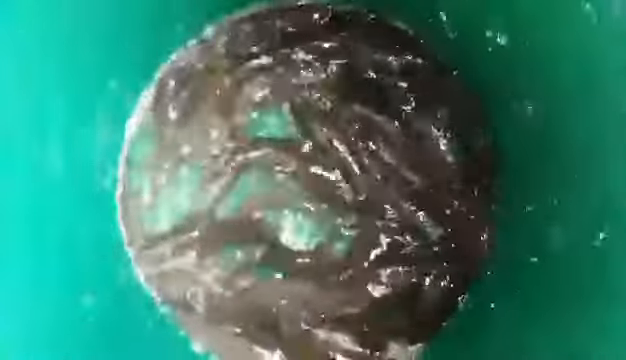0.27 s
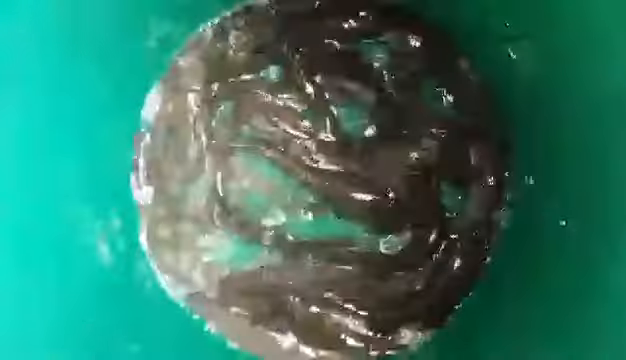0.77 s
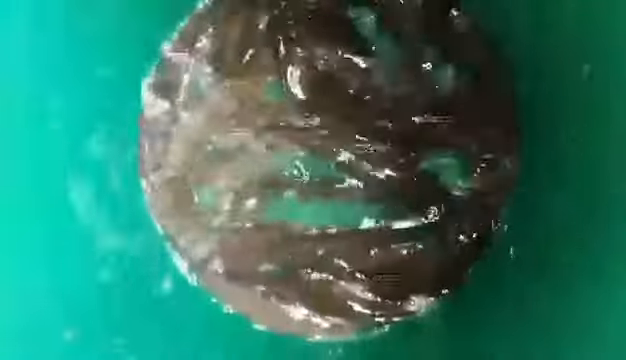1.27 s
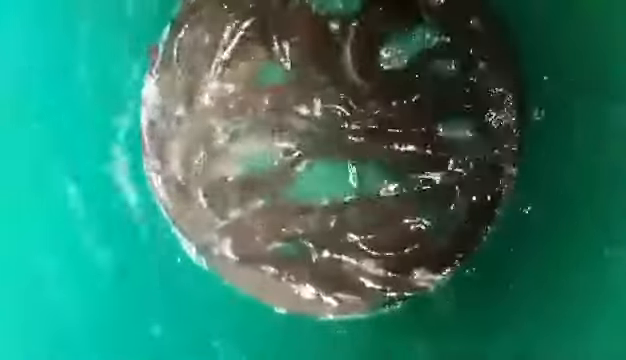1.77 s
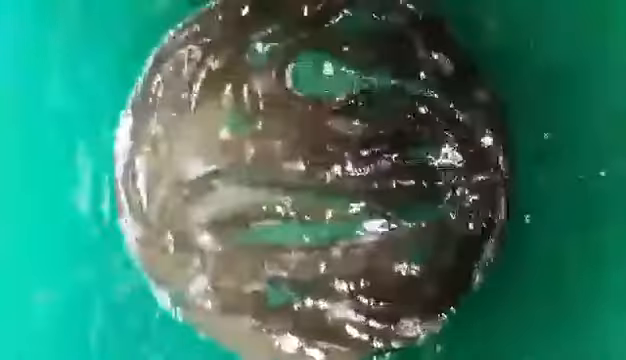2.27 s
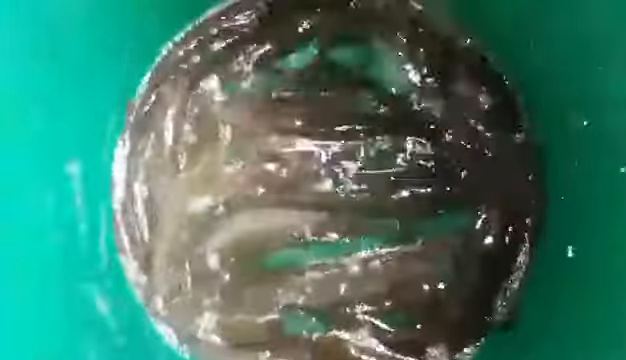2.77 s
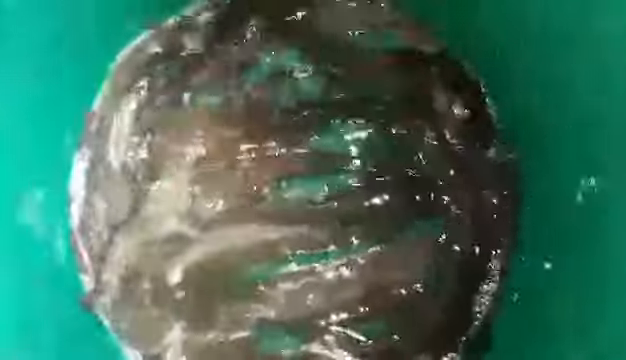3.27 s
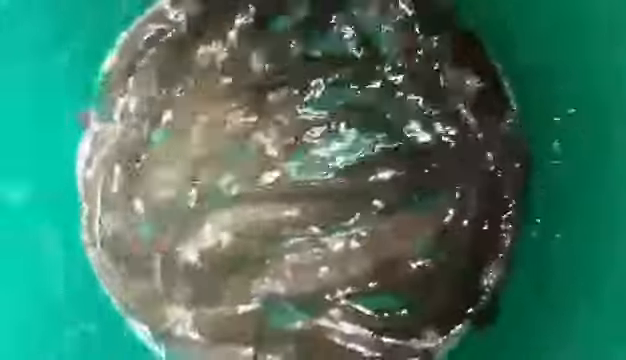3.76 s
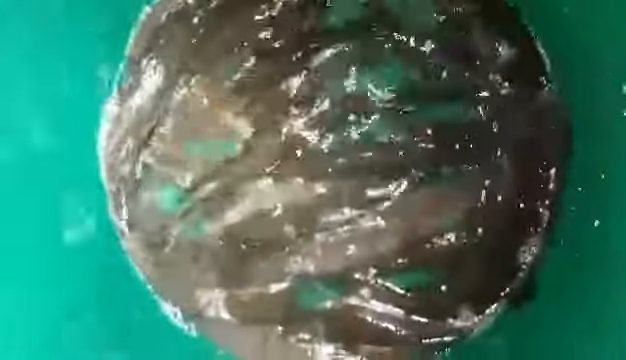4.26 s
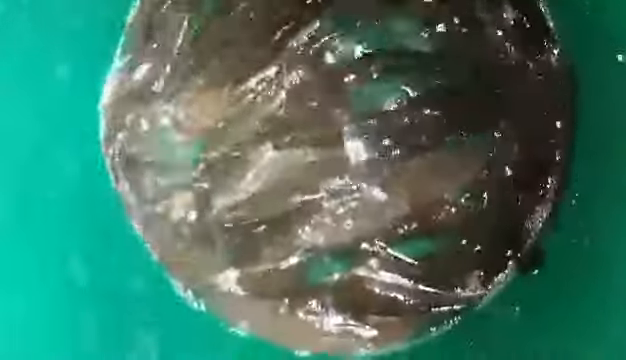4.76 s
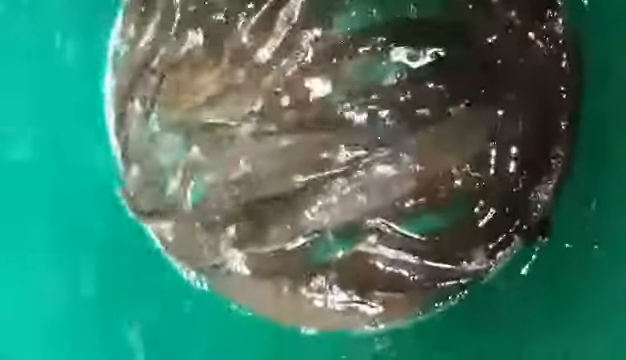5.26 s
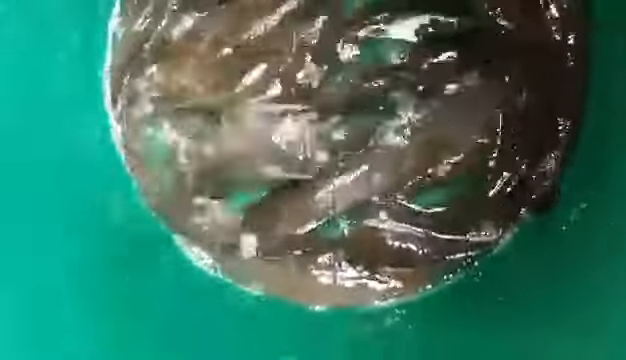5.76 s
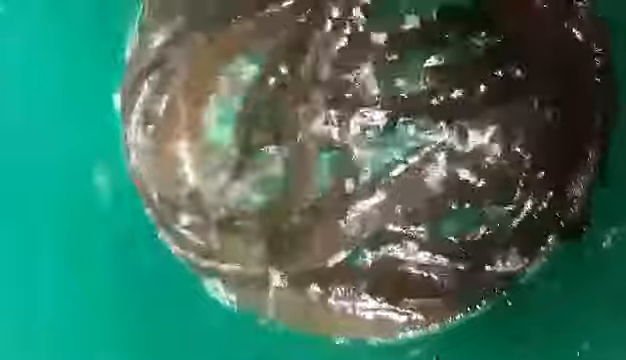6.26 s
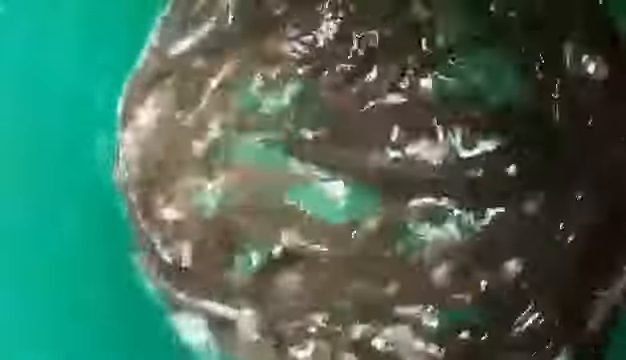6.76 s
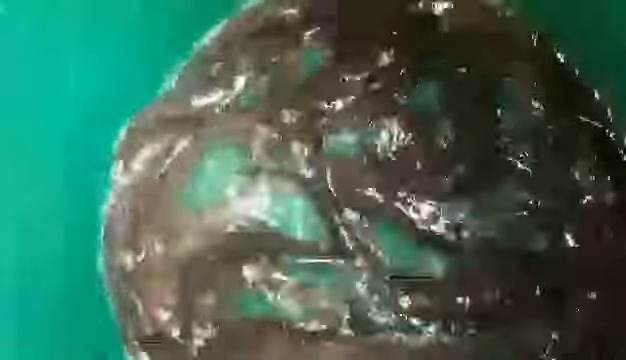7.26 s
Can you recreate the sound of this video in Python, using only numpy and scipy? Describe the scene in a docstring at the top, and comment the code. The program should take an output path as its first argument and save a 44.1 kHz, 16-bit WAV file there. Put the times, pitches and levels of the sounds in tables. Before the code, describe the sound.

Close, wet and lively: tail slaps scatter high, glassy droplets and short hissing spray, while larger bubbles gulp underneath. After two seconds soft bodies drum on the tub's resonant floor, with another quick run of thumps around four seconds. Splashing returns, growing denser and more continuous in the last two seconds. Plastic walls add brief reflections; the outdoor background is very quiet.

```python
"""A slap and its spray are heard first: small fish thrash in a finger of water in a deep plastic tub outdoors.
Slaps free swarms of decaying bubble tones and filtered-noise spray; larger bubbles gulp, lone ones sing.
Bodies strike the drum-like bottom, heard as damped modes; rubbing and nudging keep the modes sounding.
Feedback delays echo the water sounds between the walls; breeze, a far hush and a faint insect lie beneath.
A small microphone adds the resonances of its port and cuts the top."""
import sys
import numpy as np
from scipy import signal
from scipy.fft import rfft, irfft, next_fast_len
from scipy.io import wavfile
from scipy.ndimage import uniform_filter1d

SR = 44100
rng = np.random.default_rng(int(sys.argv[2]) if len(sys.argv) > 2 else 0)


def put_to_file(sound):
    """Save the sound as 16-bit audio at rate SR, in the file named by the first command-line argument."""
    columns = np.atleast_2d(sound).T  # one column per channel
    safe = np.clip(columns, -1, 1)
    whole_steps = np.round(safe * 32767)
    wavfile.write(sys.argv[1], SR, whole_steps.astype(np.int16))


N = 332073

# Light wind on the microphone: start_s, level_db
BREEZE_CURVE = [(0.0, -67), (0.75, -58), (1.55, -41.5), (1.8, -60), (2.2, -52), (2.6, -67.5), (3.3, -58),
                (3.7, -71.5), (4.2, -53.5), (5.0, -69.5), (5.45, -64), (6.85, -56.5), (7.53, -57)]
# Spectrum of the far outdoor hush: pitch_hz, level_db (per Hz)
HUSH_SPECTRUM = [(18, -2), (30, -30), (133, 11.5), (206, -21.5), (674, -4), (1350, -14), (1530, -5.5),
                 (2920, -55.5), (5010, -37), (6640, -24), (14000, -30)]
HUSH_DB = -70.5
# Far insect whine, with the time its fade begins
INSECT_DB, INSECT_FADE_START_S, INSECT_FADE_DB_PER_S = -90, 2.9, 65.5

# The shoal churning against the tub: start_s, slosh_level_db, bottom_drumming_level_db
CHURN_CURVES = [(0.0, -72.5, -60.5), (1.17, -80, -80.5), (1.45, -57, -51), (1.89, -72.5, -72),
                (2.12, -46, -47), (2.6, -74, -67.5), (3.0, -50.5, -55.5), (3.31, -57, -45),
                (3.58, -69.5, -64), (3.9, -80.5, -56), (4.11, -56.5, -52), (4.47, -64, -46),
                (4.63, -62, -68), (5.01, -79, -70.5), (5.79, -50.5, -48.5), (6.27, -56.5, -48),
                (6.65, -44, -53), (7.53, -51, -45.5)]
# Upper modes of wall and bottom: pitch_hz, loaded_level_db, full_t60_s, free_bottom_gain_db
UPPER_MODES = [(272.8, -8, 0.23, 7), (309, -2.5, 0.085, -2.5), (358.7, -1, 0.13, -8), (443, -5, 0.15, -8.5),
               (555, -19, 0.62, -1.5), (677, -8, 0.18, 2.5), (892.5, -3, 0.15, -0.5), (985, -6.5, 0.22, 4)]
LOADED_RING, RUBBED_RING = 0.4, 0.6   # shares of the upper modes' full ring time
# Lowest bottom resonances under shifting load: pitch_hz, nominal_width_hz, level_db
BOTTOM_RESONANCES = [(107.4, 42, -0.5), (134, 190, 9.5), (143.8, 9.4, 6.5)]

# Fine spray between the slaps: start_s, level_db
SPRAY_CURVE = [(0.0, -61.5), (0.25, -60.5), (0.63, -66), (1.26, -65.5), (1.45, -59), (1.68, -62.5),
               (1.91, -70), (2.58, -70.5), (2.91, -64.5), (3.84, -68), (4.07, -56), (4.32, -70.5),
               (4.63, -60.5), (5.01, -75.5), (5.22, -75), (5.35, -58), (5.68, -65.5), (5.87, -54),
               (6.0, -44.5), (6.25, -54), (6.6, -48), (6.92, -45), (7.19, -48.5), (7.4, -38), (7.53, -45)]
# Spectrum of the spray: pitch_hz, level_db (per Hz)
SPRAY_SPECTRUM = [(600, -3.5), (1100, -1.5), (1300, -13), (1550, -2.5), (2390, -2), (2700, -4.5), (3410, 2),
                  (4300, -2), (4900, 8), (6100, -5.5), (6800, -14.5), (10700, -26.5), (13500, -27),
                  (14500, -62)]
FIZZ_DB, FIZZ_HZ = -30, 7000   # finest mist: level re the spray, lower band edge

# Tail slaps: start_s, nominal_level_db, bubble_pitch_hz, t60_s, wash_level_db (re nominal)
TAIL_SLAPS = [(0.0044, -17, 3940, 0.1, -27.5), (0.0706, -27.5, 5250, 0.083, -6.5),
              (0.108, -30, 5360, 0.058, -36), (0.194, -23.5, 2810, 0.16, -14.5),
              (0.3048, -34, 2180, 0.14, -17), (0.337, -33.5, 2280, 0.077, -9.5),
              (0.3664, -26.5, 4830, 0.083, -12), (0.4202, -34.5, 4230, 0.13, -2.5),
              (0.575, -20, 3280, 0.059, -18), (0.7322, -4.5, 3974, 0.054, -56),
              (0.839, -26, 3040, 0.13, -27), (0.965, -31.5, 3050, 0.11, -40),
              (1.166, -38, 6740, 0.026, -25), (1.192, -38.5, 2100, 0.091, -15),
              (1.2491, -28, 4160, 0.074, 0), (1.3295, -24.5, 4600, 0.056, -3.5),
              (1.348, -25.5, 4630, 0.07, -13), (1.3694, -26, 1740, 0.14, -13),
              (1.407, -24.5, 5480, 0.053, -9), (1.4326, -17, 4000, 0.041, -17),
              (1.4535, -10.5, 2630, 0.039, -3.5), (1.501, -18, 4680, 0.052, -31),
              (1.5244, -15, 3470, 0.058, -9), (1.5557, -19, 4550, 0.076, -18),
              (1.594, -24, 5500, 0.077, -11.5), (1.967, -39.5, 6670, 0.05, -21.5),
              (2.5679, -35, 5560, 0.032, -13), (2.708, -25.5, 4120, 0.14, -27.5),
              (2.794, -32, 4830, 0.14, -10.5), (3.0046, -29, 5750, 0.071, -22),
              (3.1709, -41.5, 1840, 0.062, 2.5), (3.2288, -16.5, 3030, 0.058, -25),
              (3.495, -36.5, 1835, 0.12, -15), (4.05, -35.5, 1920, 0.14, -6),
              (4.1536, -41, 1900, 0.099, -16), (4.247, -41, 3520, 0.12, -19), (4.369, -45, 2540, 0.098, -5),
              (4.589, -19, 4900, 0.059, -7), (4.755, -50, 4840, 0.13, 2.5), (4.947, -44, 4280, 0.17, -18),
              (5.219, -23.5, 3250, 0.21, -36), (5.9647, -19.5, 2046, 0.12, -15.5),
              (5.985, -26.5, 4560, 0.13, -5.5), (6.243, -22.5, 5340, 0.24, -47),
              (6.285, -27.5, 4050, 0.15, -13.5), (6.418, -33, 2020, 0.053, -3),
              (6.461, -27, 3130, 0.082, -6), (6.562, -31, 2740, 0.1, -13), (6.617, -28.5, 3700, 0.11, -30),
              (6.9461, -16, 2506, 0.089, -19.5), (6.982, -25, 2960, 0.064, -30),
              (7.0133, -29.5, 3680, 0.57, -9), (7.0776, -20, 3270, 0.23, -17),
              (7.4628, -17.5, 5400, 0.068, -10.5)]
SWARM_DB = -11.5   # bubble swarm re a slap's nominal level
CRACK_DB, CRACK_S = -3, 0.0019   # extra crack opening the wash: level re wash, decay time constant

TUB_T60_S, TUB_ECHO_DB = 0.19, -24
# Fine drops bursting with a bright tick: start_s, nominal_level_db
BURSTING_DROPS = [(0.0518, -26), (0.074, -26.5), (0.193, -33), (0.733, -16), (1.555, -34), (4.572, -28),
                  (5.2214, -27), (6.448, -21.5)]
# Gulps of larger bubbles: start_s, nominal_level_db, pitch_hz
BUBBLE_GULPS = [(0.072, -29.5, 747), (0.222, -42, 1630), (0.336, -42, 980), (0.427, -25, 643),
                (0.775, -44, 713), (0.873, -43.5, 780), (0.968, -34, 1730), (1.255, -20, 800),
                (1.296, -34.5, 674), (1.353, -30.5, 1590), (1.438, -21, 1080), (1.525, -22, 1590),
                (1.595, -35.5, 1440), (1.884, -34, 1000), (2.039, -31.5, 700), (2.091, -27, 960),
                (2.112, -25.5, 1420), (2.142, -38.5, 980), (2.212, -34, 1170), (2.289, -30, 1106),
                (2.469, -35.5, 1030), (2.485, -37, 1000), (2.823, -35, 588), (3.173, -29.5, 935),
                (3.175, -27.5, 608), (3.495, -30.5, 490), (3.93, -26, 1570), (5.214, -41, 985),
                (5.338, -29, 456), (6.661, -30, 444)]
GULP_T60_S, GULP_SPLASH_DB = 0.066, -5.5   # swarm decay; dull splash re nominal level

# Knocks: start_s, nominal_level_db, loaded_bottom_pitch_hz, upper_mode_level_db (re nominal)
BOTTOM_KNOCKS = [(0.427, -39.5, 139, -36), (1.254, -34.5, 153.5, -6), (1.542, -25.5, 115, -61),
                 (1.892, -32.5, 150.3, -8.5), (2.035, -15, 147, -11), (2.088, -22.5, 144.7, -5.5),
                 (2.212, -20.5, 141.9, -9.5), (2.435, -39, 139.6, -0.5), (2.661, -42, 134, -8.5),
                 (3.071, -33, 110, -30), (3.128, -29.5, 114, -46), (3.227, -25, 110, -28),
                 (3.278, -30.5, 110, -20), (3.914, -26.5, 130.2, -18), (3.952, -15.5, 134, -13.5),
                 (4.01, -17, 133, -15.5), (4.068, -21.5, 134, -37.5), (4.116, -19.5, 134, -18),
                 (4.175, -24, 134, -41), (4.215, -22, 134, -14), (4.303, -24, 131, -19),
                 (4.359, -37, 139, -18), (4.488, -29.5, 137, -4.5), (4.53, -27, 134, -15),
                 (4.587, -32, 123.5, -11), (5.335, -34, 149.2, -7.5), (5.429, -28, 114, -11.5),
                 (5.684, -31.5, 139.7, -13.5), (5.788, -34, 148.5, 3), (6.411, -28.5, 134, -34),
                 (6.796, -26, 136.6, 2), (6.861, -29.5, 144.3, -28), (7.376, -30, 139.7, -31)]
# The free bottom rings long; bodies lying on it detune and damp it
FREE_HZ, FREE_T60_S, LOADED_T60_S, LOAD_SPAN_HZ = 146.8, 0.39, 0.15, 5.9
STOP_S, PUSH_LAG_S = 0.012, 0.0043   # fade-out ending at the next knock; bottom's delay after contact
SOFT_DB_PER_OCTAVE = 1   # soft-body muting of higher modes: applied once when free, twice when loaded

# Lone clear bubbles: start_s, peak_level_db, pitch_hz, time_to_peak_s
SINGING_BUBBLES = [(1.412, -38, 2060, 0.0039), (1.512, -38.5, 3850, 0.0016), (3.497, -43, 890, 0.01),
                   (3.9115, -21.5, 4640, 0.0013), (3.917, -27, 4820, 0.0027), (3.927, -23, 4850, 0.0026),
                   (3.952, -29, 4840, 0.004), (4.05, -44.5, 1876, 0.008), (4.514, -31.5, 3446, 0.0083),
                   (4.515, -40.5, 1485, 0.014), (5.297, -19, 4820, 0.0044)]
# Bodies sweeping through water: start_s, level_db, froth_pitch_hz, held_s, wash_level_db (re froth)
BODY_SWEEPS = [(2.036, -50.5, 1450, 0.0092, -4), (2.1045, -53.5, 1490, 0.051, -9),
               (2.216, -55, 2030, 0.021, -18), (2.7594, -52.5, 1790, 0.0083, -5),
               (2.8, -51, 1990, 0.014, -11), (2.857, -51, 1970, 0.008, -9), (2.901, -66, 3270, 0.011, 3.5),
               (3.91, -38, 4910, 0.035, -1), (4.49, -59.5, 1590, 0.006, 7.5), (4.519, -41, 3400, 0.019, -9),
               (4.5633, -48.5, 3700, 0.01, 5.5), (5.1825, -58.5, 3150, 0.024, -4.5),
               (5.298, -42, 3690, 0.019, -1), (5.3258, -38, 3470, 0.0081, -0.5),
               (5.818, -63.5, 4380, 0.041, 12), (5.897, -48, 3530, 0.0055, 9.5),
               (6.093, -42.5, 5180, 0.054, -10), (6.516, -45, 3480, 0.0031, 3.5),
               (6.6675, -42, 2300, 0.0047, 1.5), (6.76, -37, 4760, 0.029, 4),
               (6.8756, -41.5, 5310, 0.0039, 0.5), (7.212, -54.5, 5300, 0.17, 4.5),
               (7.39, -55, 4200, 0.08, 10.5)]
FROTH_T60_S = 0.02

# Ringing of the microphone port: pitch_hz, width_hz, peak_gain_db
PORT_RESONANCES = [(4800, 15, 5), (3700, 330, 1.5)]
CUTOFF_HZ = 14700


def amp(db):
    """Amplitude ratio: twenty decibels make a factor of ten."""
    return 10 ** (np.asarray(db) / 20)


def rms_one(x):
    """Normalization: scale a signal to unit root-mean-square."""
    return x / np.sqrt(np.mean(x ** 2) + 1e-20)


def in_time(rows):
    """Linear interpolation: turn each curve column into a value per sample."""
    s, *columns = np.transpose(rows)
    return [np.interp(np.arange(N) / SR, s, column) for column in columns]


def drift(rate_hz):
    """Low-pass filtered chance: a slow random curve of about unit spread."""
    step = 40   # samples between computed points
    r = np.exp(-2 * step * np.pi * rate_hz / SR)
    white = rng.standard_normal(N // step + 2002)
    slow = signal.lfilter([1], [1, -2 * r, r * r], white)[2000:]   # drop the filter's start
    return np.interp(np.arange(N) / step, np.arange(len(slow)), rms_one(slow))


def coloured(x, spectrum):
    """Minimum-phase filtering: a spectrum of (Hz, dB) points is imposed without sounding early."""
    size = next_fast_len(x.shape[-1] + 4096)
    hz, db = np.transpose(spectrum)
    bins_hz = np.fft.rfftfreq(size, 1 / SR)
    gain = amp(np.interp(np.log(bins_hz + 1), np.log(hz), db))
    cepstrum = irfft(np.log(gain), size)
    cepstrum[1:size // 2] *= 2   # fold the acausal half onto the causal half
    cepstrum[size // 2 + 1:] = 0
    return irfft(rfft(x, size) * np.exp(rfft(cepstrum)), size)[..., :x.shape[-1]]


def ring(x, hz, t60):
    """Damped resonance: a unit click starts a decaying sine of initial height near one."""
    r = amp(-60 / (t60 * SR))
    w = 2 * np.pi * hz / SR
    return signal.lfilter([0, np.sin(w)], [1, -2 * r * np.cos(w), r * r], x + 1e-18)


def band(x, low_hz, high_hz):
    """Band-pass filtering: keep the energy between two frequencies."""
    return signal.sosfilt(signal.butter(2, [low_hz, high_hz], "band", fs=SR, output="sos"), x)


def add(out, s, x):
    """Superposition: mix x into out from time s."""
    i = round(s * SR)
    out[i:i + len(x)] += x[:N - i]


def grains(per_s, spread_db):
    """Random impulses: chance arrivals of either sign and very uneven size."""
    sizes_db = spread_db * np.minimum(rng.exponential(1, N), 5)
    sizes = amp(sizes_db) * rng.choice([-1, 1], N)
    return sizes * (rng.random(N) < per_s / SR)


def droplets(clicks, low_hz, high_hz, cycles):
    """Bubble resonance by size: each click rings one of 24 pitches, losing 60 dB in the given cycles."""
    dealt = rng.integers(0, 24, N)
    pitches = np.geomspace(low_hz, high_hz, 24)
    return sum(ring(clicks * (dealt == k), hz, cycles / hz) * np.sqrt(hz) for k, hz in enumerate(pitches))


def tub_modes(x, ring_share):
    """Modal superposition of wall and bottom: x is one push for all modes, or one for each."""
    pushes = np.broadcast_to(x, (len(UPPER_MODES), N))
    return sum(amp(db) * ring(pushes[k], hz, t60 * ring_share) * (-1) ** k
               for k, (hz, db, t60, _) in enumerate(UPPER_MODES))


def swarm(s, db, hz, t60, octaves, cycles, chance):
    """Bubble-cloud radiation: thick at first, then thinning; most share a size, a few stray far."""
    when, tone, size = chance * (np.arange(chance.shape[1]) > 0)   # the first bubble is the loudest
    born = t60 * .5 * when ** 2
    stray = octaves * np.sin(2 * np.pi * tone) ** 5
    pitch = hz * 2 ** np.maximum(stray, 0.37 * stray)[:, None]   # small strays go farther than large ones
    height = amp(db - 60 * born / t60 - 7.7 * np.sqrt(size))[:, None]
    t = np.arange(SR // 30) / SR
    swell = 1 - np.exp(-t * pitch / 1.5)
    tone_wave = np.sin(2 * np.pi * pitch * t * (1 + 0.27 * t))   # rising as they near the air
    bubbles = swell * tone_wave * amp(-60 * t * pitch / cycles)
    at = np.round((s + born[:, None]) * SR).astype(int) + np.arange(len(t))
    return np.bincount(np.minimum(at, N).ravel(), (height * bubbles).ravel(), N + 1)[:N]


def washes(count, size):
    """Filtered random spatter: uneven droplets, every splash with colour patches of its own."""
    unevenness = amp(2.6 * rng.standard_normal((count, size // 32 + 1))).repeat(32, axis=1)[:, :size]
    spatter = rng.standard_normal((count, size)) * unevenness
    patches = amp(3.0 * rng.standard_normal((count, 40)))
    patches = patches.repeat(size // 80 + 1, axis=1)[:, :size // 2 + 1]
    smooth_patches = uniform_filter1d(patches, size=size // 160, axis=1)
    patchy = irfft(rfft(spatter) * smooth_patches, size)
    dull = signal.butter(2, 8000.0, fs=SR, output="sos")
    wash = signal.sosfilt(dull, coloured(patchy, SPRAY_SPECTRUM))
    return spatter, wash / wash.std(axis=1, keepdims=True)


def outdoors(breeze_db):
    """Broadband and resonant noise: lumpy breeze on the microphone, far hush and a faint insect."""
    gusts = amp(3.5 * drift(12.0))
    breeze = rms_one(band(rng.standard_normal(N), low_hz=32.0, high_hz=80) * gusts)
    hush = coloured(rng.standard_normal(N), HUSH_SPECTRUM) * amp(4.3 * drift(1.2))
    hush = hush / np.std(band(hush, 140, 14000))   # level reference excludes the lowest rumble
    insect = rms_one(ring(rng.standard_normal(N), hz=9000, t60=.008))
    fading_s = np.maximum(np.arange(N) / SR - INSECT_FADE_START_S, 0)
    insect_gain = amp(INSECT_DB - INSECT_FADE_DB_PER_S * fading_s)
    return amp(breeze_db) * breeze + amp(HUSH_DB) * hush + insect_gain * insect


def slosh(slosh_db):
    """Frictional excitation: soft bodies rub the wall's modes while larger bubbles gurgle."""
    soft = signal.butter(1, 700.0, fs=SR, output="sos")
    rubbing = grains(400.0, spread_db=6.0) * amp(3.5 * drift(15.0))
    rub = tub_modes(signal.sosfilt(soft, rubbing), RUBBED_RING)
    gurgle = droplets(grains(200.0, spread_db=4.0), low_hz=276, high_hz=498, cycles=26.7)
    return amp(slosh_db) * rms_one(rms_one(rub) + 0.76 * rms_one(gurgle))


def drumming(bottom_db):
    """Random excitation of resonance: countless soft nudges keep the bottom humming."""
    nudges = grains(140.0, spread_db=-5.5)
    hum = sum(amp(db) * rms_one(ring(ring(nudges, hz, 6.3 / width), hz, 0.17))
              for hz, width, db in BOTTOM_RESONANCES)
    return amp(bottom_db) * rms_one(hum)


def spray(spray_db):
    """Droplet impacts and noise: clumps on a thin hiss, low and high bands fluctuating separately."""
    clumps = amp(2.2 * drift(25.0))
    drops = droplets(grains(1600.0 * clumps, spread_db=2.0), low_hz=1107.0, high_hz=6775, cycles=140.0)
    drops_and_hiss = rms_one(drops) + .75 * rng.standard_normal(N)
    mix = clumps * rms_one(coloured(drops_and_hiss, SPRAY_SPECTRUM))
    low = signal.sosfilt(signal.butter(2, 2800.0, fs=SR, output="sos"), mix)
    high_swell = amp(2.2 * drift(6.0))
    fizz = amp(FIZZ_DB) * clumps * rms_one(band(rng.standard_normal(N), FIZZ_HZ, 14200))
    low_part = low * amp(0.57 * drift(10.0))
    high_part = (mix - low + fizz) * high_swell
    return amp(spray_db) * rms_one(low_part + high_part)


def slaps():
    """Impact on a free surface: each slap frees a swarm of small bubbles and a ragged wash."""
    bubbles, out, t = 0, np.zeros(N), np.arange(SR // 4) / SR
    chances = rng.random((len(TAIL_SLAPS), 3, 40))
    slap_washes = washes(len(TAIL_SLAPS), len(t))[1]
    crack = 1 + amp(CRACK_DB) * np.exp(-t / CRACK_S)
    onset = t / (t + 0.0048)
    for (s, db, hz, t60, wash_db), chance, wash in zip(TAIL_SLAPS, chances, slap_washes):
        bubbles = bubbles + swarm(s, db + SWARM_DB, hz, t60, 0.587, 62.0, chance)
        near = rms_one(band(wash, hz / 2.11, hz * 1.49))   # droplet sizes gather round the bubbles'
        envelope = onset * amp(db - 60 * t / t60)
        add(out, s, envelope * amp(wash_db) * crack * (wash + 0.27 * near))
    dull = signal.butter(4, 6500.0, fs=SR, output="sos")   # the smallest bubbles radiate little
    return signal.sosfilt(dull, bubbles) + out * amp(2.0 * drift(76.0))


def tub_echo(x):
    """Repeated wall reflection: six short feedback delays return the sound with decay."""
    size = next_fast_len(N + SR)
    w = 2 * np.pi * np.fft.rfftfreq(size)
    lags = np.array([.0026, .0041, .0059, .0083, .0112, .0157]) * SR   # seconds to samples
    loops = [amp(-60 * lag / SR / TUB_T60_S) * np.exp(-1j * w * lag) for lag in lags]
    return irfft(rfft(x, size) * sum(g / (1 - g) for g in loops), size)[:N]


def ticks():
    """Transient radiation: bursting drops give bright noise a few milliseconds long."""
    out, t = np.zeros(N), np.arange(SR // 20) / SR
    envelope = t / (t + 0.012) * amp(-60 * t / 0.012)
    for (s, db), white in zip(BURSTING_DROPS, rng.standard_normal((len(BURSTING_DROPS), len(t)))):
        add(out, s, amp(db) * envelope * rms_one(band(white, low_hz=5200, high_hz=14700)))
    return out


def gulps():
    """Entrained-air resonance: air folded under a body forms large bubbles in a dull splash."""
    out, t = np.zeros(N), np.arange(SR // 4) / SR
    chances = rng.random((len(BUBBLE_GULPS), 3, 20))
    whites = rng.standard_normal((len(BUBBLE_GULPS), len(t)))
    for (s, db, hz), chance, white in zip(BUBBLE_GULPS, chances, whites):
        out += swarm(s, db, hz, GULP_T60_S, 0.79, 14.3, chance)
        envelope = t / (t + 0.012) * amp(db + GULP_SPLASH_DB - 45 * t / GULP_T60_S)
        add(out, s, envelope * rms_one(band(white, hz / 1.3, hz * 1.47)))
    return out


def knocks():
    """Modal impact under load: a soft body strikes; the next one stops the loaded bottom's ring."""
    out, strikes, t = np.zeros(N), np.zeros((2, len(UPPER_MODES), N)), np.arange(SR) / SR
    # Each knock lands on a spot of its own, with its own mode levels in dB
    spots = 2.0 * rng.standard_normal((len(BOTTOM_KNOCKS), len(UPPER_MODES)))
    mode_hz, _, _, free_gain_db = np.transpose(UPPER_MODES)
    muted_db = SOFT_DB_PER_OCTAVE * np.log2(mode_hz / mode_hz[0])
    gaps = np.append(np.diff(np.transpose(BOTTOM_KNOCKS)[0]), 1)
    swell = 1 - np.exp(-t / 0.014)
    for (s, db, hz, upper_db), spot_db, gap in zip(BOTTOM_KNOCKS, spots, gaps):
        free = np.exp(-((hz - FREE_HZ) / LOAD_SPAN_HZ) ** 2)   # 1 is free, 0 fully loaded
        t60 = LOADED_T60_S + (FREE_T60_S - LOADED_T60_S) * free
        stopped = free + (1 - free) * np.clip((gap - t) / STOP_S, 0, 1)
        envelope = amp(db) * swell * stopped * amp(-60 * t / t60)
        add(out, s + PUSH_LAG_S, envelope * np.sin(2 * np.pi * hz * t))
        strike_db = db + upper_db + spot_db + free * free_gain_db - (2 - free) * muted_db
        strikes[round(free), :, round(s * SR)] = amp(strike_db)
    soft = signal.sosfilt(signal.butter(2, 600.0, fs=SR, output="sos"), strikes)
    return out + tub_modes(soft[0], LOADED_RING) + tub_modes(soft[1], 1)


def pings():
    """Single-bubble oscillation: a lone bubble swells, sings on one pitch and fades."""
    out, t = np.zeros(N), np.arange(SR // 5) / SR
    for s, db, hz, swell in SINGING_BUBBLES:
        envelope = (t / swell * np.exp(1 - t / swell)) ** 2
        add(out, s, amp(db) * envelope * np.sin(2 * np.pi * hz * t))
    return out


def froth(hz, spatter, t60):
    """Continuously driven resonance: bubbles of one size ring as narrow noise, already under way."""
    return rms_one(ring(np.tile(spatter, 2), hz, t60)[len(spatter):])


def sweeps():
    """Flow excitation and decay: a sweep holds its froth and wash, then the water settles."""
    out, t = np.zeros(N), np.arange(SR // 2) / SR
    for (s, db, hz, held, wash_db), spatter, wash in zip(BODY_SWEEPS, *washes(len(BODY_SWEEPS), len(t))):
        shape = t / (t + 0.0028) * amp(db - 344.0 * np.maximum(t - held, 0))   # settles in dB per s
        near = rms_one(band(wash, hz / 2.68, hz * 2.05))   # droplet sizes gather round the froth's
        add(out, s, shape * (froth(hz, spatter, FROTH_T60_S) + amp(wash_db) * (1.33 * wash + near)))
    return out * amp(0.63 * drift(43.0))


def scene():
    """Linear superposition: water, its wall echoes, the struck tub and open air add together."""
    slosh_db, bottom_db = in_time(CHURN_CURVES)
    water = slaps() + sweeps() + gulps() + pings() + ticks() + spray(*in_time(SPRAY_CURVE))
    tub = slosh(slosh_db) + drumming(bottom_db) + knocks()
    echo = amp(TUB_ECHO_DB) * tub_echo(water)
    return (water + echo + tub + outdoors(*in_time(BREEZE_CURVE)))[None]


def record(dry):
    """Port resonance and band limiting: a few high pitches ring and the top is cut."""
    for hz, width, db in PORT_RESONANCES:
        dry = dry + (amp(db) - 1) * signal.lfilter(*signal.iirpeak(hz, hz / width, fs=SR), dry)
    return signal.sosfilt(signal.cheby2(14, 80, CUTOFF_HZ, fs=SR, output="sos"), dry)


dry = scene()
out = record(dry)
put_to_file(out)
```